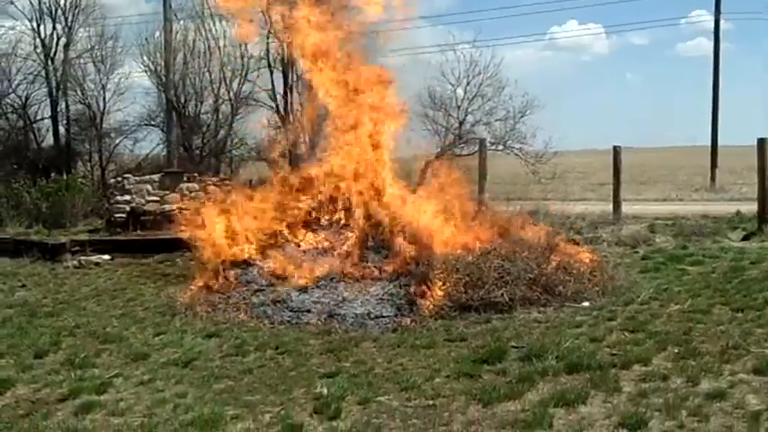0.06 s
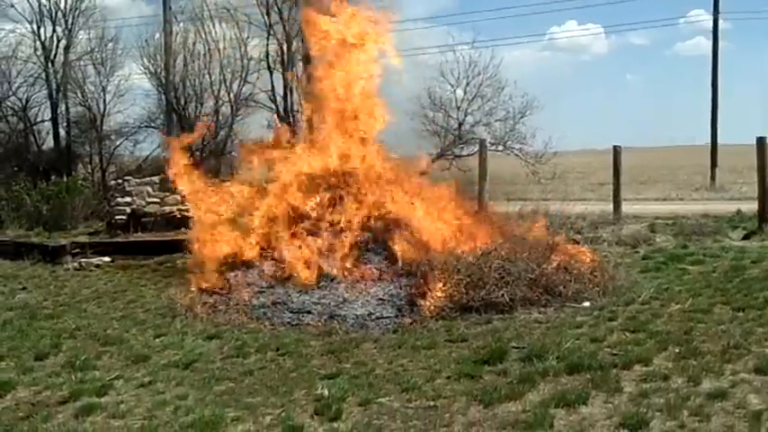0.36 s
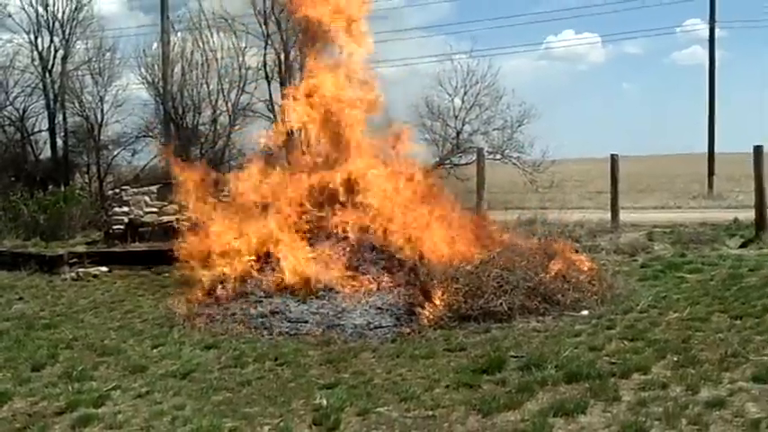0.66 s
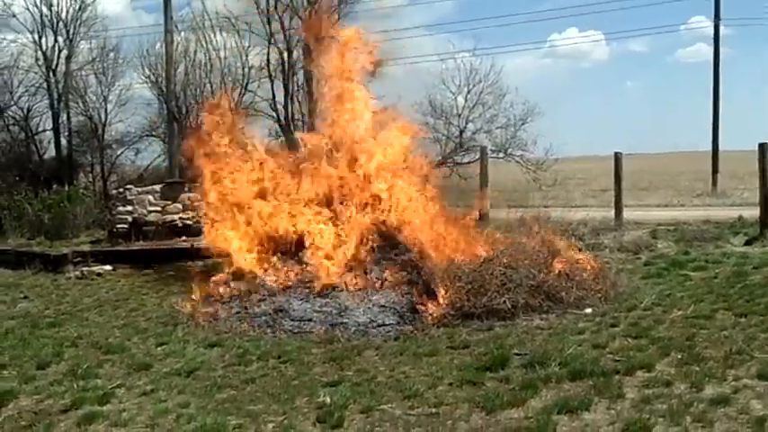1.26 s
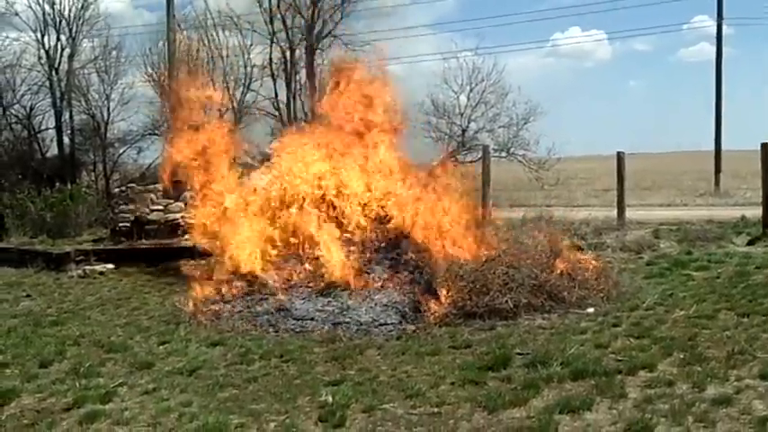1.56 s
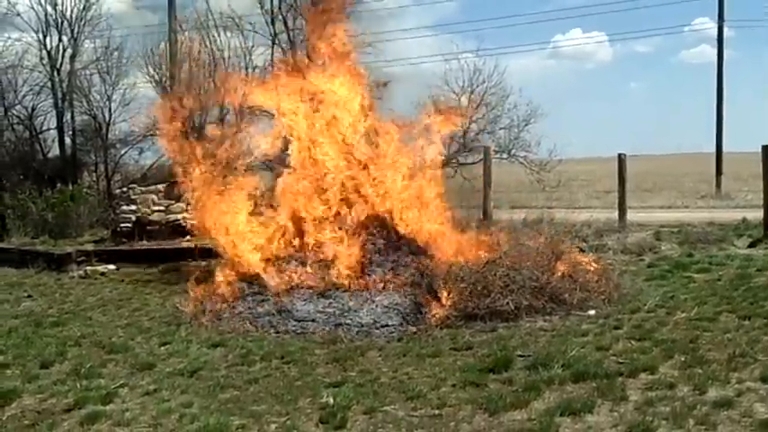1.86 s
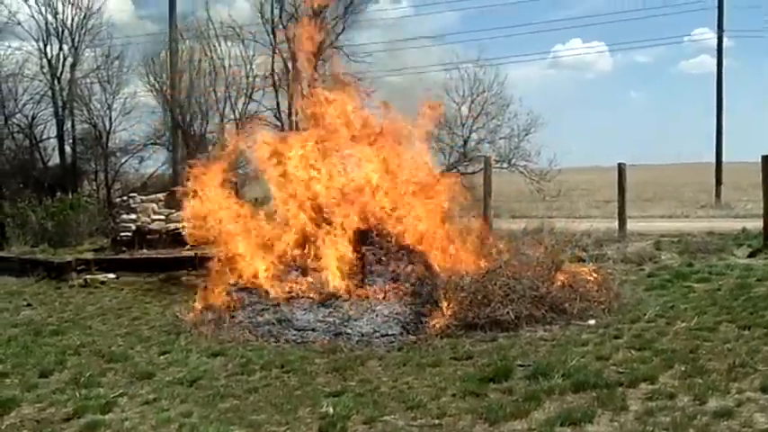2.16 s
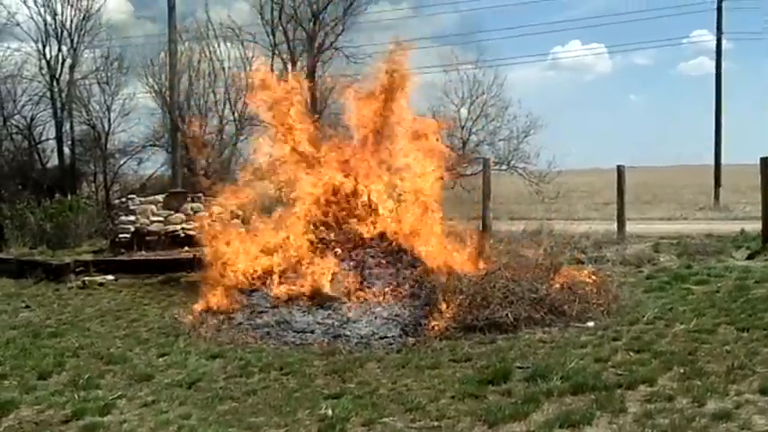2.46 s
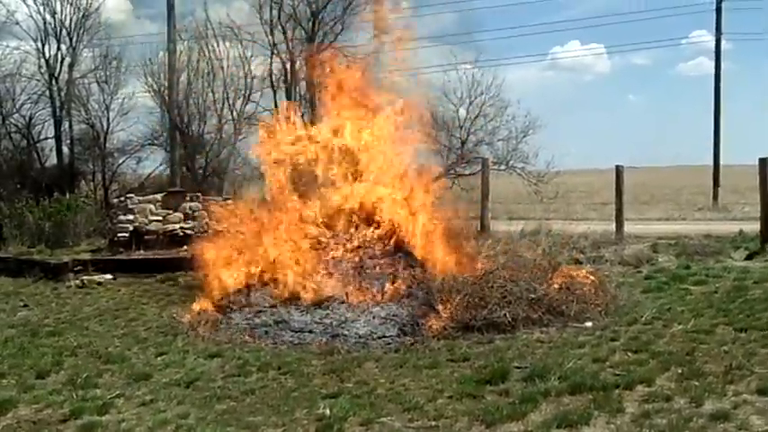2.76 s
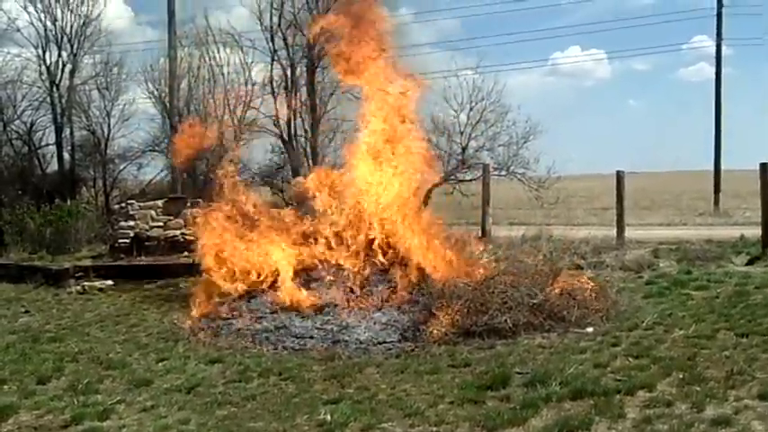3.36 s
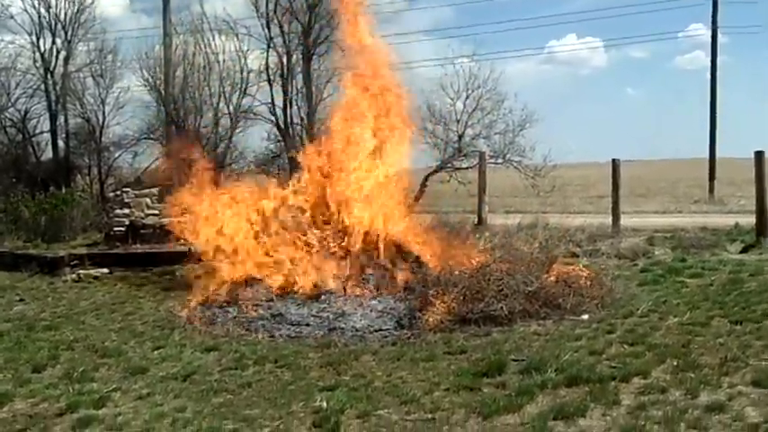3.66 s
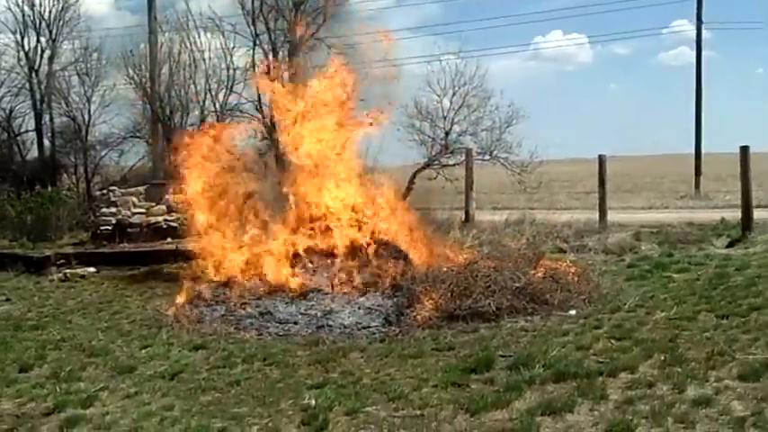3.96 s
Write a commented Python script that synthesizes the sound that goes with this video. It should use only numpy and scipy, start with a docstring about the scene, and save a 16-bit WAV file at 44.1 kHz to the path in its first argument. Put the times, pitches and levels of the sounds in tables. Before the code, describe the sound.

Burning dry brush pops and crackles outdoors, roaring softly as wind gusts rumble.

```python
"""Sharp snaps and splintering over a fine crackle and a soft roar: dry brush burning in an open field.
Stems burst and tear, twigs tick, turbulent gas roars and rushes, and a faint whistle comes and goes.
Gusts rumble on a small microphone a few metres away; eddies buffet it, hardest near the end."""
import sys
import numpy as np
from scipy import signal
from scipy.fft import rfft, irfft
from scipy.io import wavfile

SR = 44100
rng = np.random.default_rng(int(sys.argv[2]) if len(sys.argv) > 2 else 0)


def wav_out(sig):
    """Save sig, one row per channel (or a flat mono array), as 16-bit PCM at SR to the path in sys.argv[1]."""
    wavfile.write(sys.argv[1], SR, np.round(np.clip(np.atleast_2d(sig).T, -1, 1) * 32767).astype(np.int16))


N = 176400
T = np.arange(N) / SR

# Gust strength: time_s, level_db
GUST_LEVEL = [(0, -42), (.12, -38), (.2, -52), (1.1, -51), (1.43, -40), (1.48, -28.5), (1.72, -31.5),
              (1.77, -45), (1.89, -40), (1.96, -30), (2.09, -24.5), (2.14, -48.5), (2.69, -41),
              (2.76, -33.5), (2.84, -45), (3.13, -38.5), (3.2, -52), (3.28, -30), (3.44, -27), (3.52, -39),
              (3.58, -32), (3.69, -29), (3.86, -42.5), (3.92, -20), (3.98, -20), (4, -48)]
# Wind rumble: freq_hz, gain_db
RUMBLE_SPECTRUM = [(10, -43), (25, -11.5), (60, -0.5), (105, -1.5), (160, -11), (300, -32), (600, -40.5),
                   (1500, -85), (5000, -117)]
# Eddies hitting the microphone: middle_s, envelope_db, pitch_hz, half_width_s, jolt_energy_db
EDDIES = [(1.477, -20.5, 117, 0.0091, -36), (1.522, -21, 105, 0.0066, -38),
          (3.281, -22.5, 185, 0.0044, -36), (3.322, -15.5, 130, 0.0048, -36),
          (3.403, -10.5, 197, 0.0049, -2), (3.416, -17, 237, 0.005, -21),
          (3.4447, -6.5, 121, 0.00737, -6.5), (3.578, -19, 105, 0.0061, -36),
          (3.888, -20, 116, 0.0045, -32), (3.9135, -12.5, 139, 0.0055, -7), (3.9247, -8.5, 137, 0.0048, -8),
          (3.9425, -2, 132.3, 0.0078, 7.5), (3.959, -9.5, 182, 0.0041, 1.5), (3.985, -10, 140, 0.0053, -9),
          (3.9925, -5, 113, 0.0027, -4.5)]
# Sharp jolt of an eddy: freq_hz, gain_db
JOLT_SPECTRUM = [(80, -16), (220, 7.5), (380, 6), (650, -7), (1000, -11.5), (1400, -17.5), (1900, -28),
                 (3200, -32.5), (6000, -44.5), (9000, -57)]
# Whistle swells: middle_s, pitch_hz, level_db
WHISTLE_SWELLS = [(.14, 1160, -60), (.25, 1129, -54), (.37, 1172, -56.5), (.45, 1137, -57.5),
                  (3.33, 1160, -61), (3.6, 1090, -58)]
# Low roar of the flames: freq_hz, gain_db
ROAR_SPECTRUM = [(15, -22), (40, -23), (100, -0.5), (200, -0.5), (280, -8.5), (350, -13), (500, -14),
                 (750, -24.5), (1500, -51), (4000, -49.5)]
# Rush of the flames: freq_hz, gain_db
RUSH_SPECTRUM = [(100, -15.5), (400, 2.5), (800, -0.5), (1150, -1), (1700, -5), (2500, -10), (4000, -15),
                 (6000, -24), (9000, -46)]
# Flaring of the rush: time_s, level_db
FLARE_LEVEL = [(0, -55.5), (.6, -55.5), (.85, -51.5), (1.55, -55), (1.68, -49.5), (1.8, -50.5), (1.95, -53),
               (2.52, -54.5), (2.73, -52), (3.0, -56), (4, -56.5)]
# Twig crackle: freq_hz, gain_db
CRACKLE_SPECTRUM = [(300, -3), (1000, 20), (2400, 8.5), (5000, 8.5), (6500, -4), (8500, -17), (16000, -16)]
# Liveliness of the burning twigs: time_s, level_db
TWIG_LEVEL = [(0, -68), (.2, -67), (.42, -57), (.55, -62.5), (1.55, -60.5), (1.68, -60), (1.82, -60),
              (2.3, -65), (2.7, -60.5), (4, -62.5)]
# Woody knock under a crack: freq_hz, gain_db
KNOCK_SPECTRUM = [(150, -17), (480, 1), (1080, 0.5), (1600, -12), (4000, -58)]
# Fizz on top of a crack: freq_hz, gain_db
FIZZ_SPECTRUM = [(1000, -17), (5000, 17.5), (9000, 8.5), (11000, 11), (13000, 9), (16000, 6)]
# Bursting stems: start_s, energy_db, centre_hz, fizz_trim_db, top_hz, splinter_re_crack_db
STEM_BURSTS = [(0.6183, -23.5, 3300, -22, 10000, 9), (0.7174, -10, 3280, -30, 16000, -13),
               (0.7756, -12.5, 2940, -39, 15000, -19), (1.169, -24, 2220, -34, 9000, 1),
               (1.275, -12.5, 3780, -34, 9900, -17), (1.431, -20.5, 2080, -35, 11000, -5),
               (1.5346, -21.5, 3330, -29, 7500, -1), (1.7034, -20.5, 2720, -32, 7500, -19),
               (1.9986, -15, 2230, -39, 10000, -11), (2.0498, -18, 1770, -29, 6960, 3),
               (2.076, -11, 2150, -34, 10000, -2), (2.104, -23.5, 3150, -36, 5950, -2),
               (2.4642, -19, 3270, -27, 6500, 10), (2.5105, -25.5, 2780, -38, 7000, -11),
               (3.0619, -22, 3300, -25, 16000, -6), (3.15, -23.5, 2320, -33, 7080, -2),
               (3.232, -26.5, 2980, -28, 9900, -4), (3.3226, -24, 3060, -29, 12000, -8),
               (3.5095, -24, 2900, -22, 8760, 1), (3.7652, -18, 2930, -34, 8000, -3),
               (3.7746, -25, 3260, -27, 9500, 10), (3.8403, -16, 3460, -26.5, 15000, -17)]
# Microphone response: freq_hz, gain_db
MIC_RESPONSE = [(20, -1), (7350, -1.5), (7600, -3), (7700, -23), (7820, -8.5), (8050, -0.5), (12500, 0),
                (16000, -1)]


def amp(db):
    """Decibels to gain."""
    return 10 ** (np.asarray(db) / 20)


def unit(x):
    """Scale to rms 1."""
    return x / np.sqrt(np.mean(x ** 2) + 1e-20)


def bell(x, sigma):
    """Gaussian, peak 1."""
    return np.exp(-.5 * (x / sigma) ** 2)


def spectrum(points, hz):
    """Gain from a dB table, on a log-frequency axis."""
    freq_hz, gain_db = np.transpose(points)
    return amp(np.interp(np.log(hz + 1), np.log(freq_hz), gain_db))


def level(points):
    """Gain over time from a dB table."""
    return amp(np.interp(T, *np.transpose(points)))


def add(mix, start_s, sound):
    """Mix a sound in at start_s."""
    part = mix[max(round(start_s * SR), 0):][:len(sound)]
    part += sound[:len(part)]


def response(gain):
    """Minimum-phase impulse response from per-bin gain."""
    log_gain = np.log(np.maximum(np.r_[gain, gain[-2:0:-1]], 1e-5))
    return np.fft.ifft(np.exp(np.conj(signal.hilbert(log_gain)))).real


def impulse(points, size=4096):
    """Impulse response of a spectrum table."""
    return response(spectrum(points, np.fft.rfftfreq(size, 1 / SR)))


def colour(x, points):
    """Causal filter following a spectrum table."""
    return signal.fftconvolve(x, impulse(points))[:N]


def noise(points):
    """Steady coloured noise, rms 1."""
    gain = spectrum(points, np.fft.rfftfreq(N, 1 / SR))
    return unit(irfft(rfft(rng.standard_normal(N)) * gain, N))


def wander(rate_hz):
    """Smooth random drift, rms 1."""
    hz = np.fft.rfftfreq(N, 1 / SR)
    return unit(irfft(rfft(rng.standard_normal(N)) * np.exp(-(hz / rate_hz) ** 2) * (hz > 0), N))


def wind(smooth_s=0.078, side_gain=-0.45):
    """Gusts rumble on the microphone; each eddy swings the pressure and gives three sharp jolts."""
    air = noise(RUMBLE_SPECTRUM)
    window = np.hanning(int(smooth_s * SR)) / (smooth_s * SR / 2)
    air /= np.sqrt(signal.fftconvolve(air ** 2, window, "same") + 0.076)  # evens out the level
    out = level(GUST_LEVEL) * air
    jolt = impulse(JOLT_SPECTRUM)
    jolt /= np.linalg.norm(jolt)
    for middle_s, envelope_db, pitch_hz, half_width_s, jolt_db in EDDIES:
        t = T - middle_s
        out += amp(envelope_db) * np.sin(2 * np.pi * pitch_hz * t) * np.exp(-(t / half_width_s) ** 2)
        for side in (-1, 0, 1):  # leading, main, trailing
            offset_s = side * 0.419 * half_width_s * rng.uniform(0.678, 1.477)
            add(out, middle_s + offset_s, amp(jolt_db) * jolt * (side_gain if side else 1))
    return out


def whistle(swell_s=0.065, width_hz=80, waver_hz=32):
    """A faint, wavering band of noise swells and fades."""
    out = np.zeros(N)
    for middle_s, pitch_hz, level_db in WHISTLE_SWELLS:
        cycles = np.cumsum(pitch_hz + waver_hz * wander(rate_hz=28.3)) / SR
        band = (wander(width_hz) + 1j * wander(width_hz)) * np.exp(2j * np.pi * cycles)
        out += amp(level_db) * band.real * np.exp(-((T - middle_s) / swell_s) ** 2)
    return out


def flames(roar_db=-42.5, flutter_db=1.0, flicker_db=1.2):
    """Turbulent burning gas: a fluttering low roar, and a rush that swells as the fire flares."""
    roar = amp(roar_db + flutter_db * wander(rate_hz=27)) * noise(ROAR_SPECTRUM)
    rush = level(FLARE_LEVEL) * amp(flicker_db * wander(rate_hz=27)) * noise(RUSH_SPECTRUM)
    return roar + rush


def crackle(ticks_per_s=600, spread_db=3, kinds=16, size=256):
    """Small twigs tick at random, each kind with its own brief ring."""
    out, t = np.zeros(N), np.arange(size) / SR
    for _ in range(kinds):
        strength = amp(spread_db * np.minimum(rng.exponential(1, N), 3.6))
        ticks = strength * (rng.random(N) < ticks_per_s / kinds / SR)
        twig = rng.standard_normal(size) * np.exp(-t / rng.uniform(0.00031, 0.0017))
        out += signal.oaconvolve(ticks, unit(twig))[:N]
    return level(TWIG_LEVEL) * unit(colour(out, CRACKLE_SPECTRUM))


def stem_gain(hz, centre_hz, fizz_trim_db, top_hz, body_top_hz=6400, hollow_hz=1630):
    """Spectrum of a crack: broad body, brief ring of the stem, woody knock and fizz."""
    octaves = np.log2((hz + 1) / centre_hz)
    ring = 0.67 * bell(octaves - rng.uniform(-0.65, 0.15), 0.32)
    body = (bell(octaves, 0.91) + ring) / np.sqrt(1 + (hz / body_top_hz) ** 14)
    knock = spectrum(KNOCK_SPECTRUM, hz)
    fizz = amp(fizz_trim_db + 7.5) * spectrum(FIZZ_SPECTRUM, hz)
    hollow = 1 - 0.31 * bell(np.log2((hz + 1) / hollow_hz), 0.075)  # dip between knock and body
    return hollow * np.hypot(body + knock, fizz) / np.sqrt(1 + (hz / top_hz) ** 20)


def stem_burst(energy_db, centre_hz, fizz_trim_db, top_hz, splinter_db, size=2048):
    """One stem bursts: a crack, a spray of tearing fibres and a bounce off the ground."""
    fibres_per_s, tear_decay_s, bounce_s = 6000, 0.0062, (0.00044, 0.00045)
    t, hz = np.arange(size) / SR, np.fft.rfftfreq(size, 1 / SR)
    fibres = rng.standard_normal(size) * (rng.random(size) < fibres_per_s / SR)
    drive = amp(splinter_db) * unit(fibres * np.exp(-t / tear_decay_s)) / np.sqrt(size)
    drive[0] += 1  # first crack
    drive[int(rng.uniform(*bounce_s) * SR)] += 0.13
    gain = stem_gain(hz, centre_hz, fizz_trim_db, top_hz)
    crack = signal.fftconvolve(drive, response(gain))[:size]
    return amp(energy_db) * crack / np.linalg.norm(crack)


def pops(pops_per_s=22, base_db=-36, spread_db=6, centre_range_hz=(2010, 4600)):
    """Thin stems pop at random, louder when the twigs burn lively."""
    out = np.zeros(N)
    for when, strength, pitch in rng.random((int(pops_per_s * N / SR), 3)):
        centre_hz = np.interp(pitch, (0, 1), centre_range_hz)
        energy_db = base_db + spread_db * strength ** 2
        pop = stem_burst(energy_db, centre_hz, fizz_trim_db=-27.5, top_hz=9000, splinter_db=-5)
        add(out, when * N / SR, pop)
    return out * unit(level(TWIG_LEVEL))


def snaps(scatter_db=-21, scatter_decay_s=0.025, size=4096):
    """Loud stem bursts, faintly scattered by the surrounding brush."""
    direct = np.zeros(N)
    for start_s, *burst in STEM_BURSTS:
        add(direct, start_s, stem_burst(*burst))
    tail = rng.standard_normal(size) * np.exp(-np.arange(size) / SR / scatter_decay_s)
    return direct + amp(scatter_db) * signal.fftconvolve(direct, tail / np.linalg.norm(tail))[:N]


def scene():
    """Fire and wind, mono."""
    return (snaps() + pops() + crackle() + flames() + whistle() + wind())[None]


def record(dry, hiss_db=-65, ceiling=0.71, cutoff_hz=15720):
    """Microphone chain: hiss, narrow treble notch, soft overload on the hardest peaks, low-pass."""
    heard = colour(dry[0] + amp(hiss_db) * rng.standard_normal(N), MIC_RESPONSE)
    clipped = heard / (1 + (heard / ceiling) ** 8) ** (1 / 8)
    lowpass = signal.firwin(511, cutoff_hz, window=("kaiser", 9), fs=SR)
    return signal.oaconvolve(clipped, lowpass, "same")[None]


dry = scene()
out = record(dry)
wav_out(out)
```